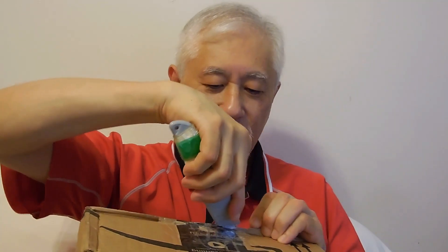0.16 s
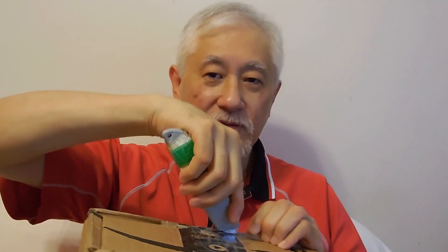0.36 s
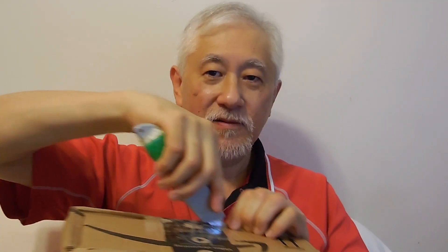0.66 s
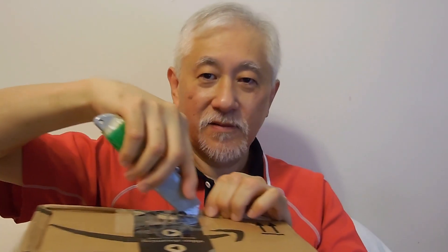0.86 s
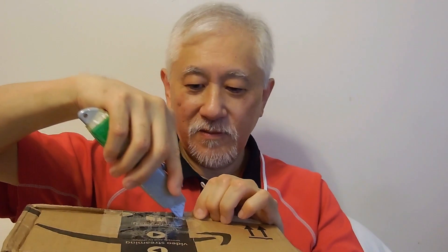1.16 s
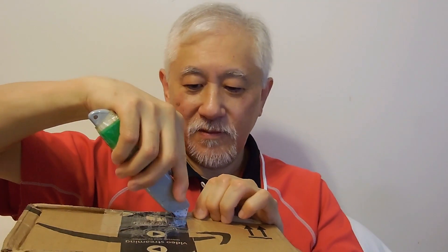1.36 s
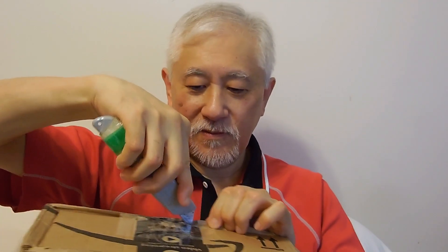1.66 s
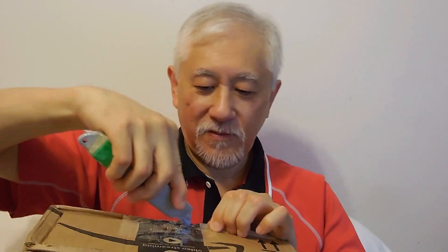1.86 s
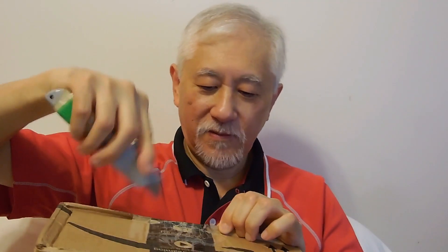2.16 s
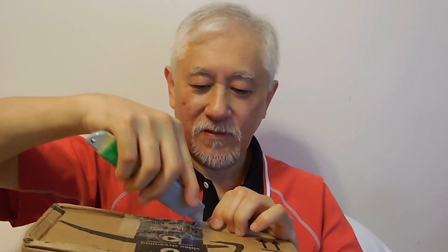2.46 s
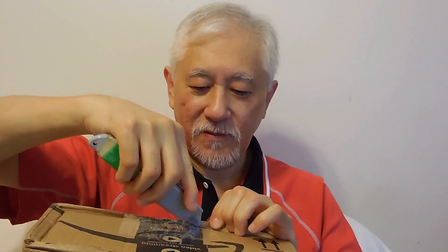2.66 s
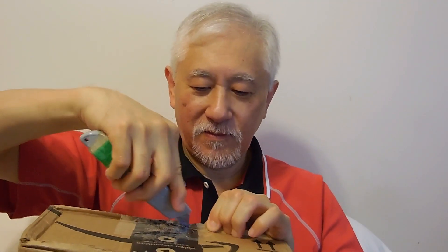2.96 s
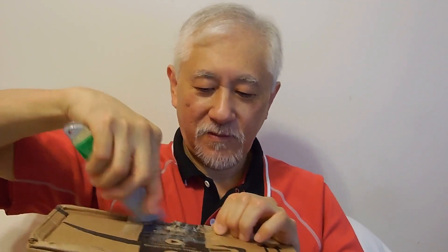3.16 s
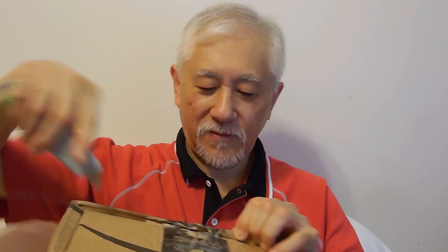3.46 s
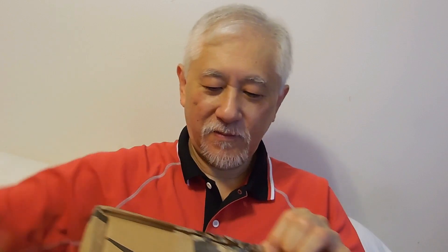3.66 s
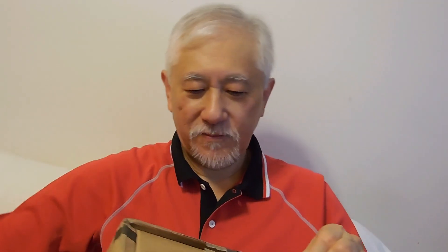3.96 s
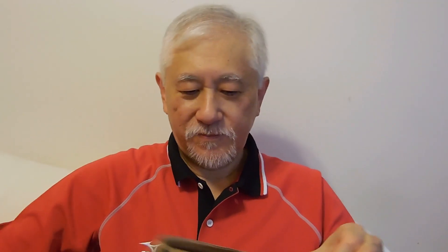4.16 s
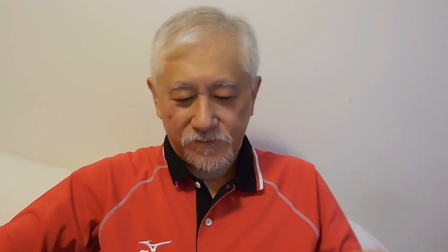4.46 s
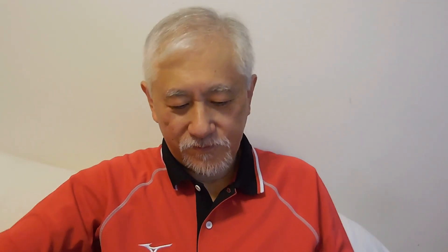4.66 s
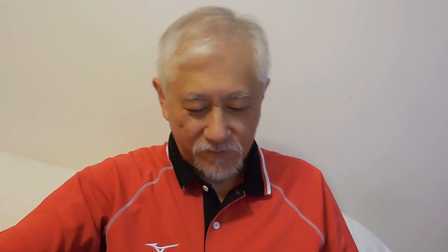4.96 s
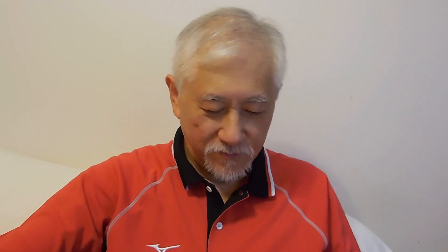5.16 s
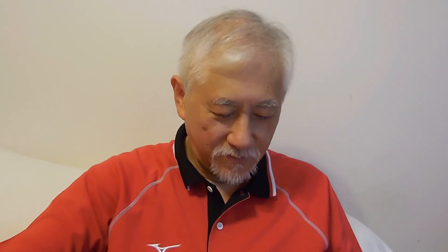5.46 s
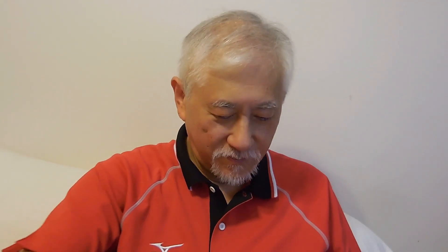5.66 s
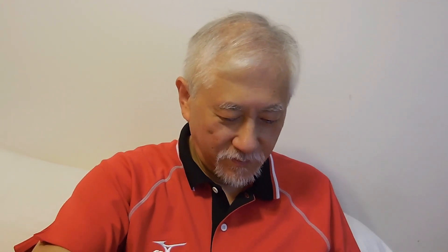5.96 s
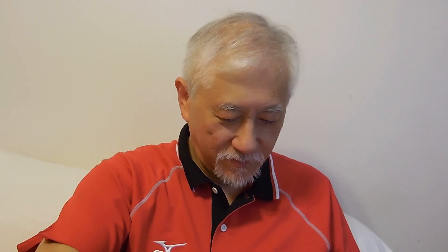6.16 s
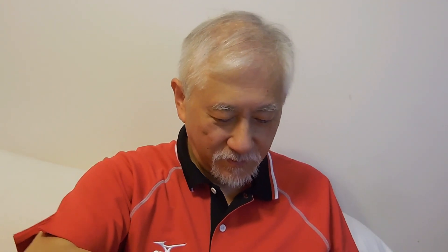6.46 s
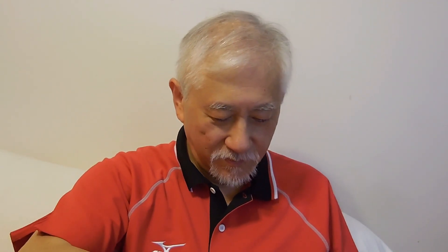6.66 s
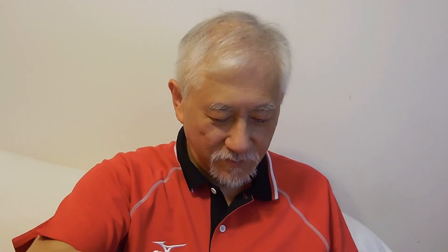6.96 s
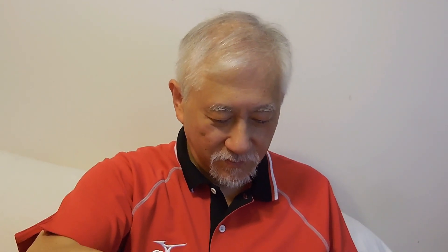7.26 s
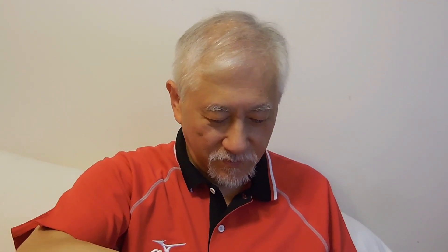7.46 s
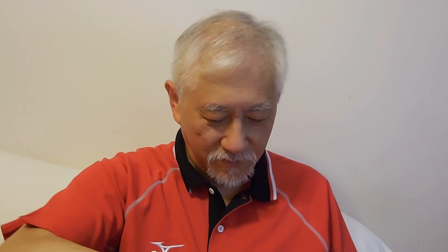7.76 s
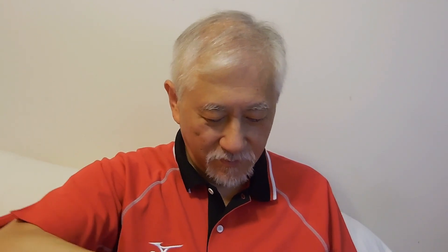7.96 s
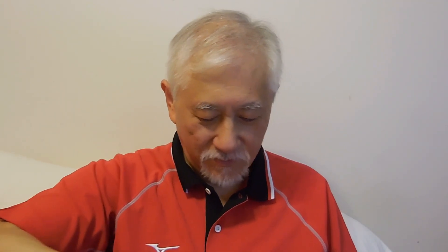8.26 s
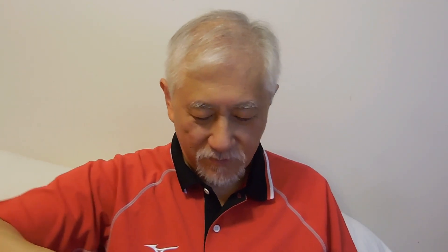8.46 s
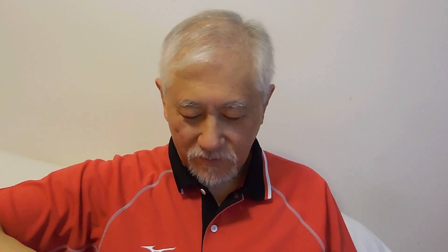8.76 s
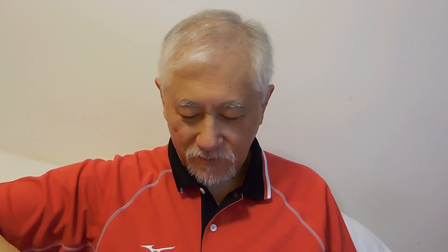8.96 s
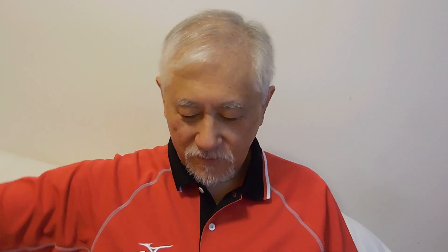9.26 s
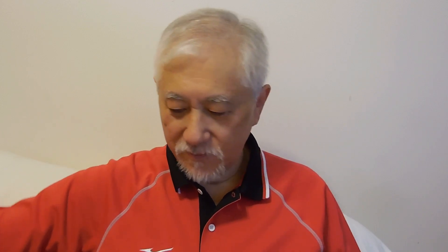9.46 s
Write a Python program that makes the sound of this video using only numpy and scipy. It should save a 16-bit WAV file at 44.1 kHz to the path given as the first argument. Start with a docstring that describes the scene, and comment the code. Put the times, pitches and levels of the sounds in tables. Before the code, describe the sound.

In a small, quiet room, a box cutter scrapes and picks at a taped cardboard box close to the microphone. The tape gives in short rips and sharp snaps, and the loose blade clicks with a faint metallic ring. The box slides softly over cloth with a few light taps. Then its flaps are pulled free in a busy run of crackling tears, hollow knocks and rubbing, with one tiny squeak.

```python
"""A small room, where a box cutter picks at a taped cardboard box close by and slits the tape in short rips.
The box slides down onto a lap, and its flaps are pulled free in crackling tears, with one squeak.
Each snap or tear is a burst of breaking fibres that excites the air cavity, the panels and the crisp tape.
Stick-slip friction gives the strokes their drag and hiss, and the loose blade rings in its own modes."""
import sys
import numpy as np
from scipy import signal
from scipy.fft import rfft, irfft, next_fast_len
from scipy.io import wavfile
from scipy.ndimage import map_coordinates

SR = 44100
rng = np.random.default_rng(int(sys.argv[2]) if len(sys.argv) > 2 else 0)


def dump(signal):
    """Clip the signal to [-1, 1] and save it as 16-bit WAV at the path in sys.argv[1]."""
    limited = np.clip(np.atleast_2d(signal).T, -1, 1)
    pcm = np.round(limited * 32767).astype(np.int16)
    wavfile.write(sys.argv[1], SR, pcm)


N = 423360

# Spectra of room air, friction drag and friction hiss. Each row: frequency in Hz, relative density in dB.
AIR_SPECTRUM = [(25, -7), (100, -16.5), (280, -5), (500, -5.5), (1200, -5), (2600, -6.5), (6000, -10),
                (16000, -19.5)]
DRAG_SPECTRUM = [(50, -35), (130, -9), (270, -3.5), (450, -4.5), (780, 2.5), (1300, 0.5), (2200, -0.5),
                 (3500, -1), (8000, -48)]
HISS_SPECTRUM = [(600, -25), (2000, 1), (3300, 1), (6500, 2.5), (10000, 0), (16000, -7)]
# Strokes of blade or hand over the board. Each row: start in seconds, end in seconds, hiss in dB.
STROKES = [(0, 0.063, -54), (0.09, 0.21, -58.5), (0.297, 0.448, -48.5), (0.49, 0.583, -55),
           (0.617, 0.883, -56.5), (0.884, 1.112, -52.5), (1.552, 1.7, -54), (2.032, 2.14, -57),
           (2.68, 2.853, -61), (3.52, 3.908, -57.5), (6.276, 6.34, -54), (6.36, 6.817, -59),
           (7.653, 7.843, -44), (8.205, 8.44, -50.5), (8.603, 8.976, -45), (9.203, 9.52, -54)]
# The box slides over cloth. Each row: time in seconds, relative hiss in dB, relative drag in dB.
SLIDE = [(3.97, -64, -67), (4.054, -52, -56), (4.172, -40.5, -49), (4.24, -40.5, -50.5),
         (4.416, -50.5, -53.5), (4.612, -54.5, -57), (4.82, -53.5, -53.5), (4.93, -49.5, -54.5),
         (5.298, -51.5, -57), (5.372, -48.5, -57.5), (5.496, -53.5, -54.5), (5.56, -61, -64)]
# First give, break and recoil of a contact. Each row: delay from the break in seconds, gain in dB.
GIVE_AND_RECOIL = [(-.009, -21), (0, -0.5), (.009, -14)]
# Sudden breaks. Each row: start in seconds, level in dB, crispness (tape over panel) in dB.
SNAPS = [(0.124, -45, -6), (0.2136, -37.5, 14.5), (0.766, -45, -7), (0.9013, -44.5, -5.5),
         (0.957, -48, -14), (1.4287, -43.5, -2.5), (1.475, -40, -10.5), (1.915, -36.5, 7.5),
         (1.932, -21, 7), (1.961, -21.5, 2.5), (2.096, -41.5, -6), (3.0011, -16, -1), (3.169, -35, 3.5),
         (3.1889, -22.5, 7), (3.2304, -33, 14), (3.3712, -49, 21.5), (3.393, -30, 11.5), (4, -40.5, -2.5),
         (4.344, -34, -4), (4.695, -40, -11), (4.7456, -40.5, -25), (4.814, -39.5, -7), (5.0525, -41, -9),
         (6.4525, -33.5, 0.5), (6.48, -39.5, 12.5), (6.5129, -35, 7), (6.788, -34, 6.5), (7.258, -40.5, 2),
         (7.405, -44, 11), (7.419, -28, 9.5), (7.628, -41.5, 7.5), (7.695, -25.5, -0.5), (7.752, -23, 1),
         (7.9233, -29, 3.5), (7.954, -29, 9), (7.968, -22, -8), (7.989, -29.5, 6), (8.031, -24, 3),
         (8.069, -20.5, -1.5), (8.1328, -22.5, -8), (8.15, -23.5, 3), (8.1881, -14.5, -4),
         (8.4554, -19.5, -2), (8.516, -26.5, -3), (8.5572, -24, -9.5), (8.598, -36.5, 5.5),
         (8.675, -34.5, 3), (8.8507, -19, 3), (8.999, -27.5, -16), (9.008, -16.5, 3), (9.0162, -19, 1.5),
         (9.0878, -25, 2)]
# The hand jolts the whole box. Each row: time in seconds, level in dB.
JOLTS = [(0.2138, -55), (3.232, -28), (3.2432, -29.5), (5.052, -52.5), (6.4534, -50), (7.989, -43),
         (8.0316, -30), (8.1883, -30.5), (9.0562, -32)]
# Modes of the enclosed air, panels and tape. Each row: frequency in Hz, width in Hz, relative gain in dB.
CAVITY_MODES = [(45, 59, -20), (168, 49, -6.5), (256.7, 44.4, 1.5), (330, 111, -1.5)]
PANEL_MODES = [(634.5, 200, -3.5), (855, 288, 2.5), (1028, 340, 1.5), (1274, 116, 2.5), (1643, 270, -2),
               (1947, 360, 0), (2527, 223, 0), (2687, 152, 1.5)]
TAPE_MODES = [(3500, 1200, -0.5), (5830, 2750, 1.5), (8210, 3850, 0), (13250, 4800, -6.5)]
# Small ticks of tape and board. Each row: start in seconds, centre frequency in Hz, level in dB.
TICKS = [(0.2151, 7100, -25), (0.64, 11000, -46), (0.7595, 7500, -45.5), (1.305, 5940, -51.5),
         (1.558, 1700, -51), (2.165, 4150, -49.5), (2.2668, 6270, -42.5), (4.044, 6500, -42.5),
         (4.5145, 1700, -46), (4.585, 1600, -44), (4.796, 1450, -44.5), (4.857, 1380, -44),
         (5.4666, 5540, -33), (6.0288, 3870, -45), (6.059, 5170, -41), (6.773, 5270, -37),
         (6.9619, 5060, -30), (7.233, 3630, -43), (7.594, 4100, -44), (7.781, 7900, -30.5),
         (8.6963, 6800, -22.5), (8.776, 8450, -35), (8.923, 6100, -39)]
# The blade knocks in its holder. Each row: start in seconds, level in dB, pitch in Hz, click gain in dB.
BLADE_KNOCKS = [(1.1413, -32, 3730, 2.5), (2.53, -37.5, 3440, 6), (2.6, -44, 3430, -12),
                (2.6422, -34.5, 3365, -8), (2.6532, -38, 3440, 1.5), (2.8238, -50, 3580, 3),
                (3.6672, -44.5, 3460, 2.5), (3.994, -42, 3500, -6)]
# Modes of the cutter. Each row: multiple of the pitch, gain in dB, time to decay 60 dB in seconds.
BLADE_MODES = [(.59, 2, 0.063), (.64, -2, 0.066), (1, 9, 0.083), (1.47, -5, .1)]
# Rips. Each row: start in seconds, end in seconds, midway level in dB, swell in dB, crispness in dB.
RIPS = [(1.903, 1.959, -26.5, 15.5, -0.5), (1.969, 1.982, -24.5, 1.5, -3), (2.994, 3.008, -19.5, -4, 7),
        (3.011, 3.085, -40, 0.5, 3.5), (3.161, 3.242, -36.5, 14, 4.5), (3.254, 3.376, -42, -8, 2),
        (6.481, 6.522, -38, 3, 6), (7.393, 7.448, -36.5, 5.5, 0), (7.685, 7.75, -29, -7, -2),
        (7.886, 7.983, -32.5, 13.5, -1.5), (8.018, 8.092, -44, 7, 3), (8.125, 8.217, -38.5, 1, 12),
        (8.394, 8.48, -33, 8, 3), (8.502, 8.629, -38, 2.5, 1), (8.699, 8.74, -39.5, -1, 11.5),
        (8.797, 8.879, -28.5, 1.5, 1.5), (9.004, 9.099, -25, 0.5, 2)]
# Decay of the room. Each row: frequency in Hz, reverberation time in seconds.
REVERB_TIMES = [(150, 0.14), (600, 0.18), (3000, 0.19), (14000, 0.18)]
# Likeness of diffuse sound at two points. Each row: frequency in Hz, left-right correlation.
COHERENCE = [(100, 0.9), (300, 0.94), (600, 0.79), (1200, 0.73), (2500, 0.34), (6000, 0.022)]
# Bearing of the box. Each row: time in seconds, lead of the right microphone in samples.
RIGHT_LEAD = [(0, -0.43), (5, -1.4), (6.3, 1), (8.2, 0.66), (8.9, -1.34)]
# Tilt to the right in the presence range. Each row: frequency in Hz, right boost and left cut in dB.
BALANCE = [(300, 0.055), (1100, 0.3), (2100, 0.61), (4000, 1.0), (12000, 0)]


def amp(db):
    """Amplitude grows tenfold every 20 dB."""
    return 10 ** (np.asarray(db) / 20)


def unit(x):
    """Normalisation to an rms of 1."""
    return x / np.sqrt(np.mean(x ** 2) + 1e-20)


def along(points, hz):
    """Interpolation of (Hz, value) points on a logarithmic frequency axis."""
    f, values = np.transpose(points)
    return np.interp(np.log(hz + 1), np.log(f + 1), values)


def wobble(rate, oversample=8):
    """Band-limited noise: a smooth curve through rate random knots a second."""
    knots = rng.standard_normal(int(N * rate / SR) + 4)
    smooth = signal.resample_poly(knots, oversample, 1)
    return np.interp(np.arange(N) * rate * oversample / SR, np.arange(len(smooth)), smooth)


def add(track, s, x):
    """Superposition: x joins the track at s seconds."""
    part = track[..., max(round(s * SR), 0):][..., :x.shape[-1]]
    part += x[..., :part.shape[-1]]


def filtered(x, response):
    """Linear filtering: the spectrum of x times a frequency response."""
    size = next_fast_len(x.shape[-1] + SR // 4, True)
    return irfft(rfft(x, size) * response(np.fft.rfftfreq(size, 1 / SR)), size)[..., :x.shape[-1]]


def ring(x, response):
    """Convolution with an impulse response scaled to unit energy."""
    return signal.oaconvolve(x, response / np.linalg.norm(response))[:N]


def resonances(modes, size=4096):
    """Modal summation: the impulse response of damped resonators of alternating sign."""
    f = np.fft.rfftfreq(size, 1 / SR)
    return irfft(sum((-1) ** k * amp(db) * 1j * f * width / (hz * hz - f * f + 1j * f * width)
                     for k, (hz, width, db) in enumerate(modes)))


def colour(spectrum, size=2048):
    """Minimum phase: folding the cepstrum gives a causal impulse response with this spectrum."""
    cepstrum = irfft(np.log(amp(along(spectrum, np.fft.rfftfreq(size, 1 / SR)))))
    cepstrum[1:size // 2] *= 2
    cepstrum[size // 2 + 1:] = 0
    return irfft(np.exp(rfft(cepstrum)))


def diffuse(pair):
    """Spatial coherence: two close microphones hear a diffuse field alike only at long wavelengths."""
    angle = lambda hz: np.arccos(np.clip(along(COHERENCE, hz), -1, 1)) / 2
    mid, side = filtered(pair, lambda hz: np.array([np.cos(angle(hz)), np.sin(angle(hz))]))
    return np.array([mid + side, mid - side])


def background():
    """Ambient noise: a diffuse field of still room air, with a faint wavering hum."""
    air = np.array([ring(rng.standard_normal(N), colour(AIR_SPECTRUM)) for _ in range(2)])
    hum = np.sin(2 * np.pi * 60 * np.arange(N) / SR) * amp(0.85 * wobble(4.5))
    return amp(-57) * unit(diffuse(air)) + amp(-80.5) * hum


def fibres(rate, spread_db):
    """Shot noise: rate tiny fractures a second, a few much larger than the rest."""
    when, chance, sign = rng.random((int(rate * N / SR), 3)).T
    sizes = amp(spread_db * np.minimum(-np.log(1 - chance), 4))
    return unit(np.bincount((when * N).astype(int), sizes * np.sign(sign - 0.5), N))


def sliding(fade_s=0.05, light_hiss_db=-50, light_drag_db=-54.5):
    """Friction envelopes: strokes add in power, and their pressure follows a power law of speed."""
    t, power = np.arange(N) / SR, np.zeros(N)
    for start, end, db in STROKES:
        now = slice(max(int((start - fade_s) * SR), 0), int((end + fade_s) * SR))
        stroke = np.clip(np.minimum(t[now] - start, end - t[now]) / fade_s + 0.54, 0, 1)
        power[now] += (amp(db) * stroke) ** 2
    speed = np.sqrt(power)
    pressure = amp(light_drag_db) * (speed / amp(light_hiss_db)) ** 0.81
    times, *levels_db = np.transpose(SLIDE)
    slide_hiss, slide_drag = (amp(np.interp(t, times, db, -np.inf, -np.inf)) for db in levels_db)
    return speed + amp(2.5) * slide_hiss, pressure + amp(0.5) * slide_drag


def rubbing(catch_db=3.5):
    """Stick-slip friction: diffuse drag and hiss that catch and slip, and a separate gritty crackle."""
    speed, pressure = sliding()
    catch = 2 * np.tanh(wobble(41) / 2)
    drag = [ring(fibres(rate=2000, spread_db=1.5), colour(DRAG_SPECTRUM)) for _ in range(2)]
    hiss = [ring(fibres(rate=6000, spread_db=1.5), colour(HISS_SPECTRUM)) for _ in range(2)]
    rub = drag * pressure * amp(2 + catch_db * catch) + hiss * speed * amp(0.5 + 1.4 * catch)
    # crumbs of board and tape crack at much the same size however hard the stroke
    crumbs = fibres(rate=110, spread_db=3) * (np.minimum(speed, amp(-52)) + amp(-70))
    grit = amp(-6.5) * ring(crumbs, resonances(TAPE_MODES))
    return diffuse(rub), grit


def contacts(events):
    """Elastic give and recoil: each (seconds, dB, ...) event becomes three."""
    return [(s + delay, db + part_db, *rest)
            for s, db, *rest in events for delay, part_db in GIVE_AND_RECOIL]


def burst(decay_s, attack_s=0.00088, size=1024):
    """Fracture of a fibre bundle: decaying noise with the energy of 10 ms at unit rms."""
    t = np.arange(size) / SR
    fade = np.exp(-t / max(decay_s, 1 / SR)) * (1 - np.exp(-t / attack_s))
    spectrum = rfft(rng.standard_normal(size) * fade)
    flattened = irfft(spectrum / np.abs(spectrum) ** 0.5) * np.sqrt(fade)
    return flattened / np.linalg.norm(flattened) * np.sqrt(SR / 100)


def shove(db):
    """An impulse on the box; its level is the rms over 10 ms."""
    return amp([db]) * np.sqrt(SR / 100)


def snaps(firm_db=-23.5, doubling_db=39):
    """Impulsive excitation: breaks drive cavity, panel and tape; jolts drive the cavity alone."""
    cavity, panel, tape = np.zeros((3, N))
    for s, db, crisp_db in contacts(SNAPS):
        base_s = 0.0027 * 2 ** ((db - firm_db) / doubling_db)  # stronger breaks run longer
        cutoff_hz = np.clip(4000 * amp(crisp_db), 1300, 9000)  # a soft contact is dull in the panel too
        crack = signal.lfilter(*signal.butter(1, cutoff_hz, fs=SR), burst(base_s * 2))
        add(panel, s, amp(db) * crack)
        add(tape, s, amp(db + crisp_db - 1) * burst(base_s * 2.84))
    for s, db, _ in SNAPS:
        add(cavity, s, shove(db - 16.5))
    for s, db in JOLTS:
        add(cavity, s, shove(db))
    return np.array([cavity, panel, tape])


def flexing(x, modes, bend):
    """Tension shifts resonance: a bending sheet wanders between slack, resting and taut tunings."""
    tension = np.tanh(wobble(22))
    share = lambda step: np.sqrt(np.maximum(1 - np.abs(tension - step), 0))
    return sum(ring(x * share(step), resonances(np.array(modes) * [1 + bend * step, 1, 1]))
               for step in (-1, 0, 1))


def cardboard(drive):
    """Forced vibration: the air in the box, its stiff panels and the tape each answer their own drive."""
    cavity, panel, tape = drive
    hollow = ring(cavity, resonances(CAVITY_MODES))
    return hollow + flexing(panel, PANEL_MODES, bend=0.13) + flexing(tape, TAPE_MODES, bend=0.25)


def ticks():
    """Heavy damping: tape and board let go in dry ticks, each through one broad resonance."""
    track = np.zeros(N)
    for s, db, hz in contacts([(s, db, hz) for s, hz, db in TICKS]):
        shred = resonances([(hz, hz * 0.59, 0)])
        add(track, s, amp(db) * ring(burst(0.0028), shred))
    return track


def cutter(ring_db=-8, board_db=-12.5):
    """Free vibration: the loose blade clicks and rings in inharmonic modes, and the board answers."""
    clicks, knocks, steel = np.zeros((3, N))
    t = np.arange(SR // 4) / SR
    for s, db, hz, click_db in contacts(BLADE_KNOCKS):
        contact = amp(db) * burst(0.0021)
        add(knocks, s, contact)
        add(clicks, s, amp(click_db) * contact)
        for ratio, mode_db, t60 in BLADE_MODES:
            chatter = np.cumsum(rng.normal(0, 0.09, len(t)))  # rattle in the holder roughens the phase
            fade = amp(db + ring_db + mode_db + rng.normal(0, 1) - 60 * t / t60)
            add(steel, s, fade * np.sin(2 * np.pi * hz * ratio * t + chatter))
    board = amp(board_db) * ring(knocks, resonances(PANEL_MODES))
    return ring(clicks, resonances(TAPE_MODES)) + steel + board


def tears(rise_s=0.0095, release_s=0.0065):
    """Crack propagation: a tear advances in jerky showers of fractures; the tape adds a sparser rasp."""
    drive = np.zeros((3, N))  # cavity, panel, tape
    grain = fibres(rate=7000, spread_db=3.5) * amp(4.1 * wobble(350))
    rasp = np.outer([0, 0.3, 0.6], fibres(rate=330, spread_db=2))
    for start, end, db, swell_db, crisp_db in RIPS:
        length = max(end - start, rise_s)
        t = np.arange(int((length + 5 * release_s) * SR)) / SR
        pull = np.minimum(t / rise_s, 1) * np.exp(-np.maximum(t - length, 0) / release_s)
        pull *= amp(db + swell_db * (np.minimum(t / length, 1) - 0.5))
        now = slice(int(start * SR), int(start * SR) + len(t))
        gains = amp([[-14], [-1.5], [crisp_db - 2.5]])
        add(drive, start, gains * (unit(grain[now]) + rasp[:, now]) * pull)
    return drive


def squeak(start_s=8.0695, length_s=0.019, start_hz=760, end_hz=920, db=-20):
    """Frictional oscillation: a flap slips past its neighbour with one short rising tone."""
    progress = np.linspace(0, 1, int(length_s * SR))
    phase = 2 * np.pi * np.cumsum(start_hz + (end_hz - start_hz) * progress) / SR
    swell = progress * (1 - progress) ** 2
    track = np.zeros(N)
    add(track, start_s, amp(db) * swell / swell.max() * np.sin(phase))
    return track


def room(x, blocks=36, onset_s=0.00074):
    """Reverberation: a short, diffuse echo whose random tail is redrawn in overlapping blocks."""
    wet, hop = np.zeros((2, N)), N // blocks
    padded = np.pad(x, (hop, 2 * hop))
    window = np.sin(np.pi * np.arange(2 * hop) / (2 * hop))
    for k in range(blocks + 1):
        hz, t, noise = signal.stft(rng.standard_normal((2, SR // 4)), SR, nperseg=256)
        decay = amp(-60 * t / along(REVERB_TIMES, hz)[:, None])
        tail = diffuse(signal.istft(noise * decay, SR, nperseg=256)[1])
        tail *= 1 - np.exp(-(np.arange(tail.shape[1]) / SR / onset_s) ** 2)
        block = padded[k * hop:][:2 * hop] * window
        echoes = signal.fftconvolve(block[None], tail / np.linalg.norm(tail[0]), axes=1)
        add(wet, max(k - 1, 0) * hop / SR, echoes[:, hop if k == 0 else 0:])
    return wet


def scene():
    """Arrival-time difference: as the box shifts, now one microphone hears it first, now the other."""
    rub, grit = rubbing()
    close = cardboard(snaps() + tears()) + ticks() + cutter() + squeak() + grit
    n = np.arange(N)
    lead = np.interp(n / SR, *np.transpose(RIGHT_LEAD))
    direct = np.array([map_coordinates(close, [n + side * lead / 2], order=3) for side in (-1, 1)])
    sound = direct + amp(-5) * room(close) + rub
    tilted = filtered(sound, lambda hz: amp(along(BALANCE, hz) * np.array([[-1], [1]])))
    return tilted + background()


def record(dry):
    """Soft saturation rounds off the tallest peaks, and a band limit removes the highest treble."""
    ceiling, top_hz = 0.62, 16000
    rounded = dry / (1 + (dry / ceiling) ** 4) ** (1 / 4)
    return filtered(rounded, lambda hz: hz < top_hz)


dry = scene()
out = record(dry)
dump(out)
```